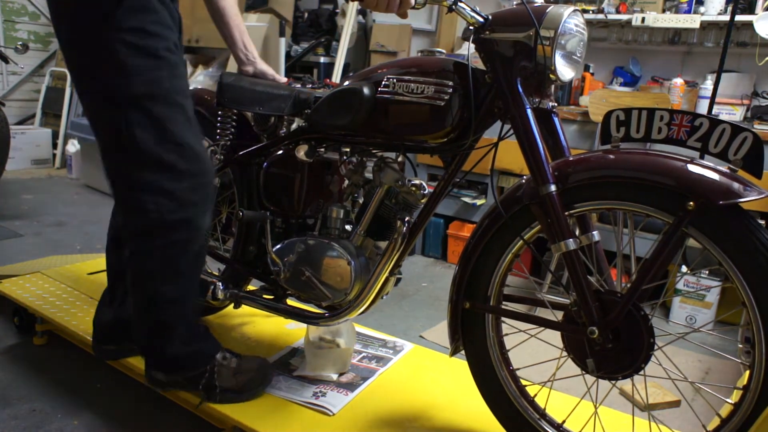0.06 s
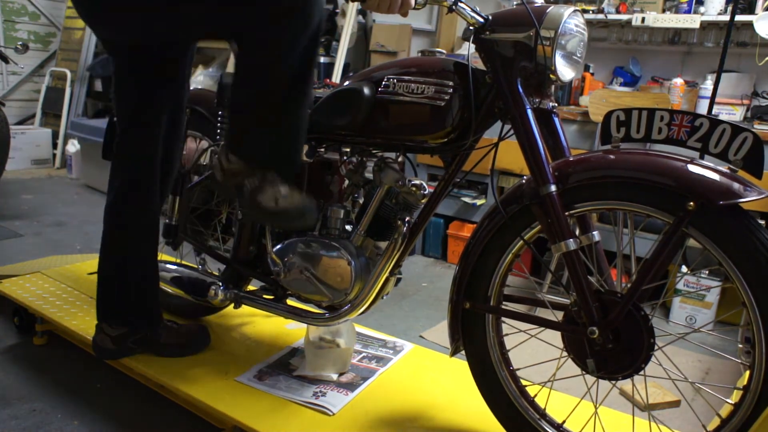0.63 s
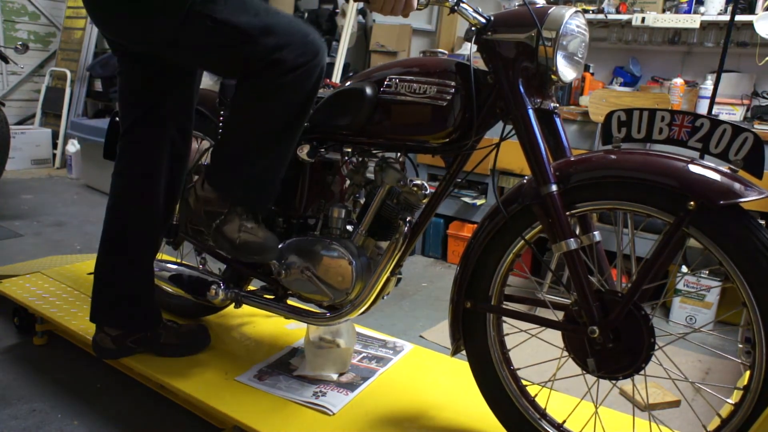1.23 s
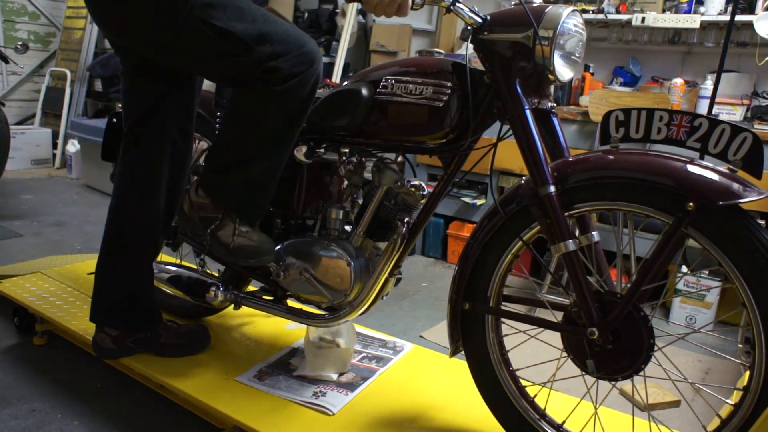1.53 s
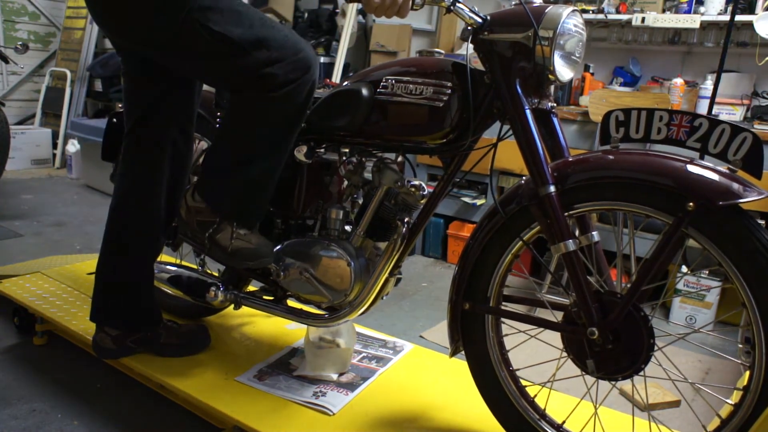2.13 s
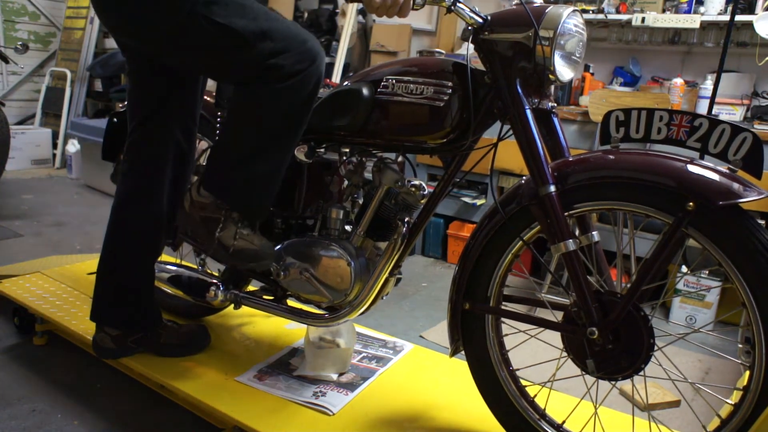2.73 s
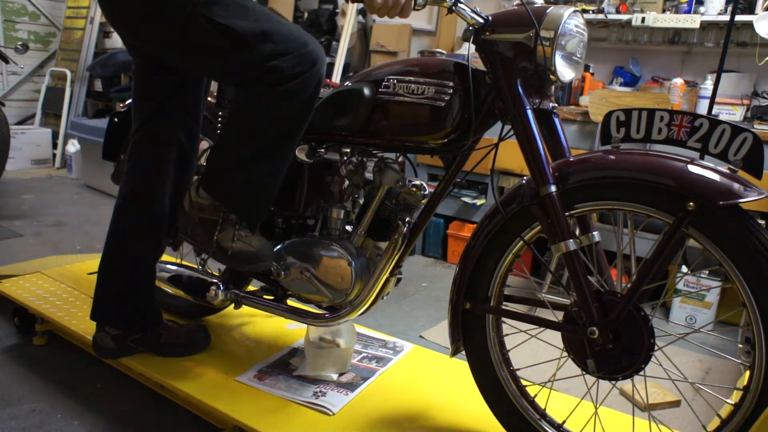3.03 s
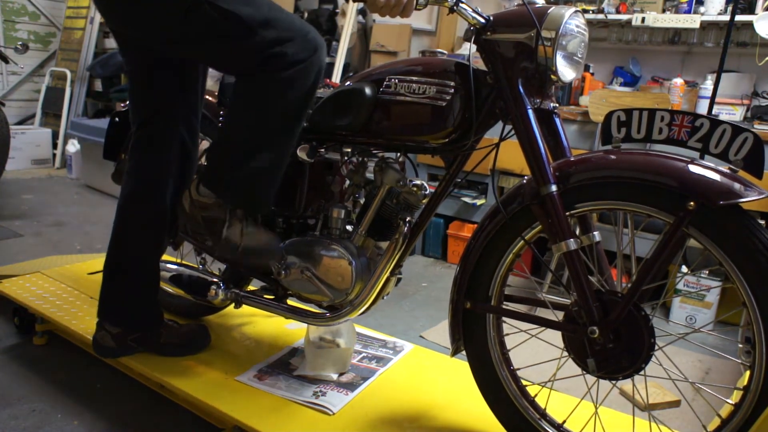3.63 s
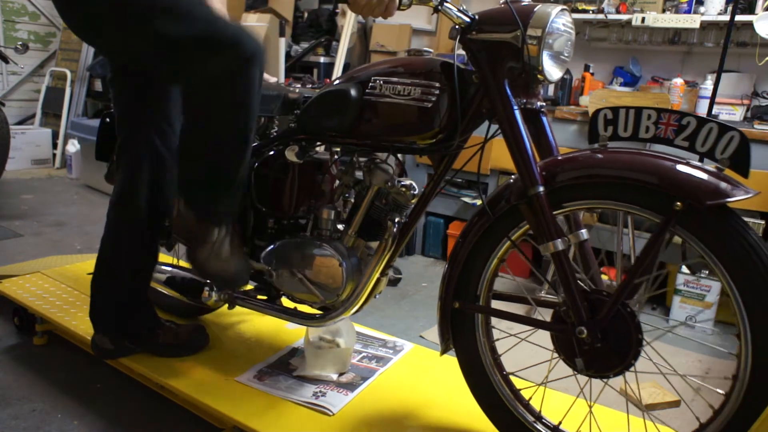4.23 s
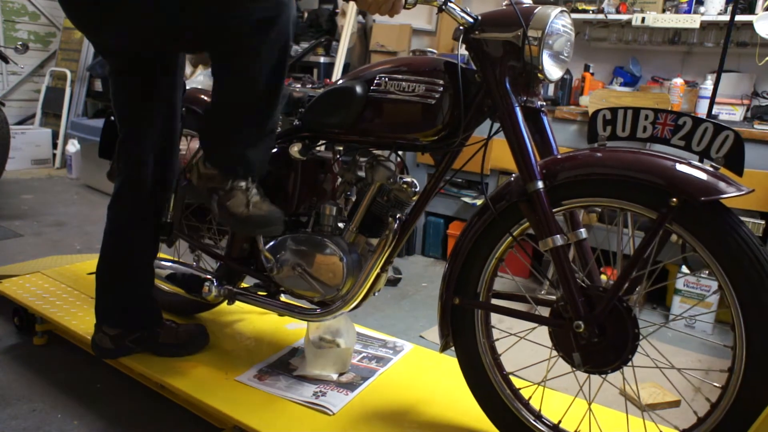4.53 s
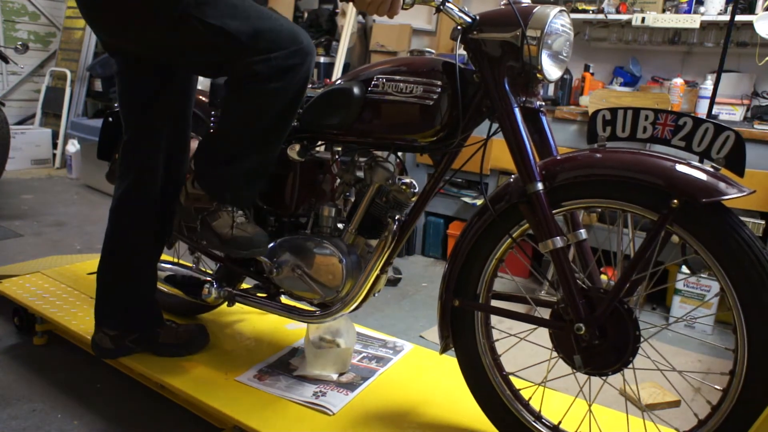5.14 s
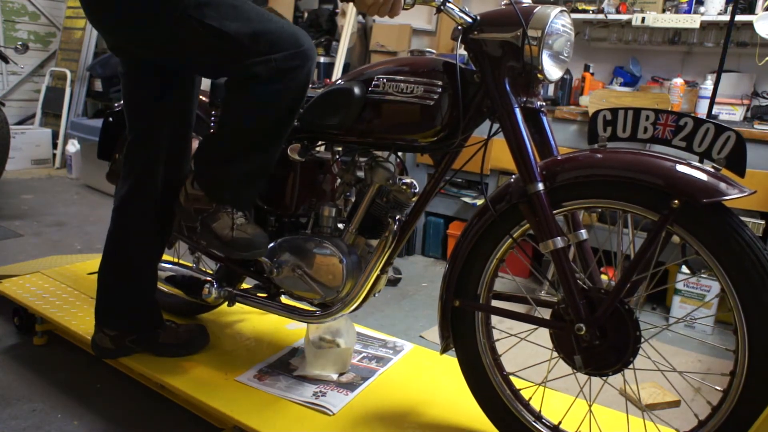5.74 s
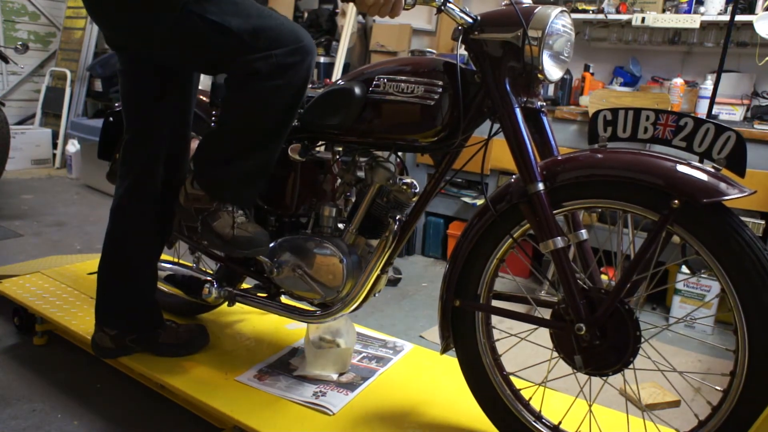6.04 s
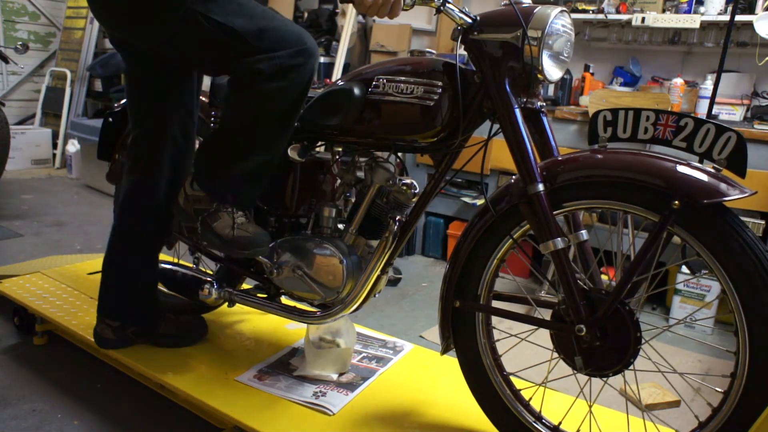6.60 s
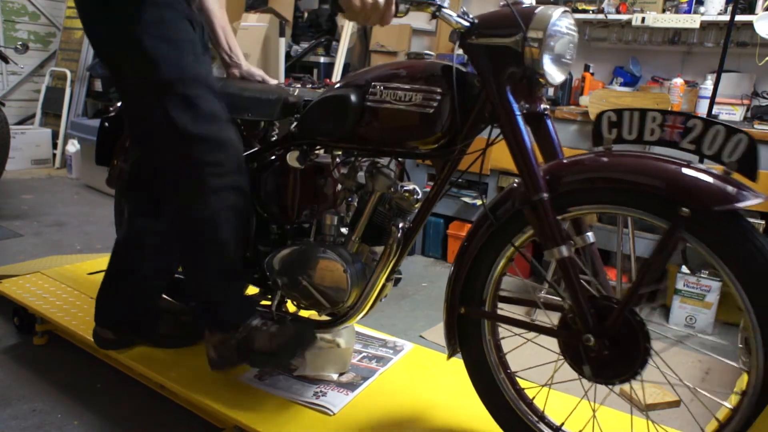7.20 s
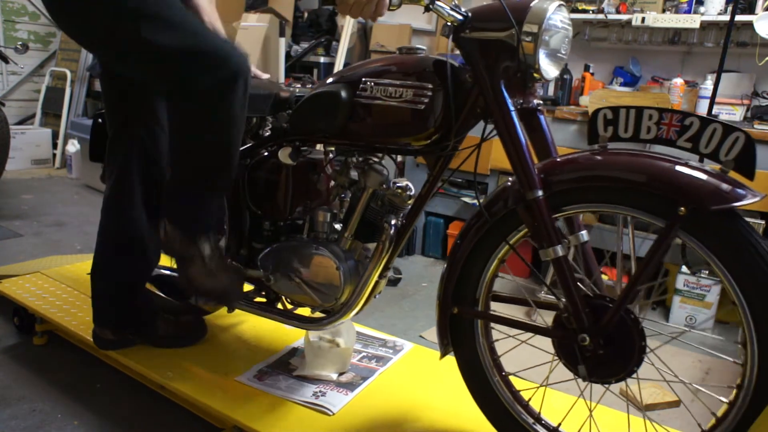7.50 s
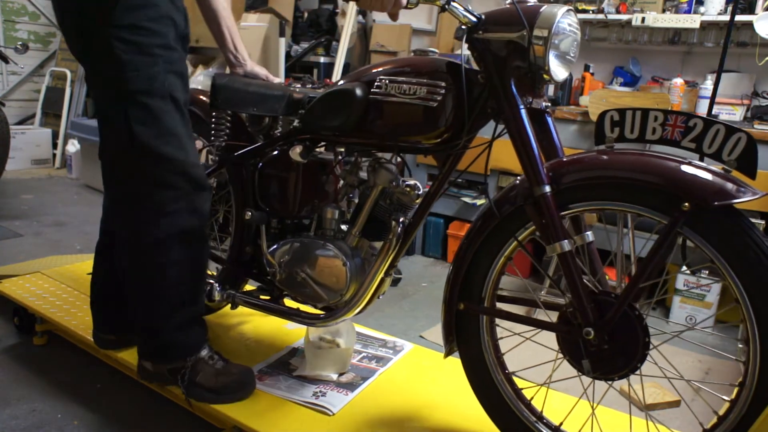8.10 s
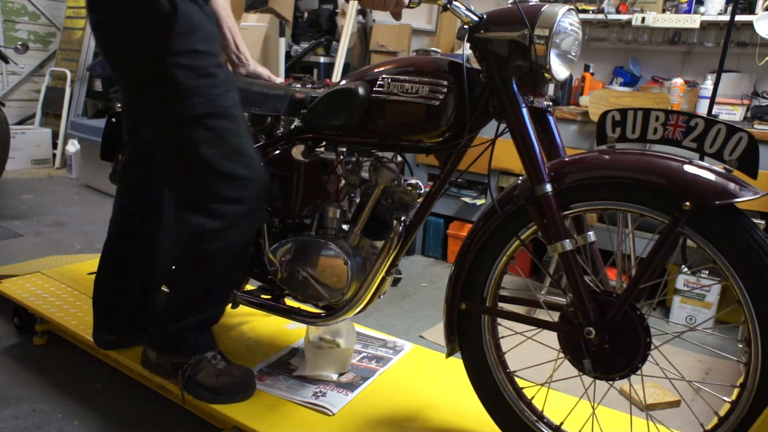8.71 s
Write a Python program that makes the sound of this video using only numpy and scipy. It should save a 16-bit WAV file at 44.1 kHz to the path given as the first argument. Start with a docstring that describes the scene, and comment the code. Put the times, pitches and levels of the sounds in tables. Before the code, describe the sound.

In a workshop, about two metres from the microphone, trousers rustle as a rider eases an old single-cylinder motorcycle over with soft hollow thumps, puffs of air and metal clicks. A hard kick spins the engine with whirring gears and a hooting intake, but it dies away as the ratchet zips back. A second kick catches, a boot thuds down, and the engine idles with clattering valves and uneven exhaust bangs.

```python
"""A workshop, short and dense in sound: two metres away, an old single-cylinder four-stroke motorcycle
is kickstarted. Trousers rustle as the rider eases the engine over with hollow thumps, puffs of air and
pawl clicks. One kick spins it in vain, with whirring gears, a hooting intake, a boot landing on the
steel lift and a zip of the ratchet. The next kick catches, and the engine idles with clattering valve
gear and uneven exhaust bangs."""
import sys
import numpy as np
from scipy import signal
from scipy.fft import rfft, irfft
from scipy.io import wavfile
from scipy.ndimage import uniform_filter1d

SR = 44100
rng = np.random.default_rng(int(sys.argv[2]) if len(sys.argv) > 2 else 0)


def unload_audio(sound):
    """Save the sound as a 16-bit wav file, at the path given as the first command line argument."""
    columns = np.transpose(np.atleast_2d(sound))
    # keep every value between -1 and 1, then stretch to whole-number steps
    steps = np.round(np.clip(columns, -1, 1) * 32767)
    wavfile.write(sys.argv[1], SR, steps.astype(np.int16))


N = 386316
T = np.arange(N) / SR
HIT_T = T[:2 ** 14]  # time axis of a one-shot


def undb(db):
    """Decibels to gain."""
    return 10 ** (np.asarray(db) / 20)


def unit(x):
    """Scale to rms 1."""
    return x / np.sqrt(np.mean(x ** 2))


def over_hz(f, points):
    """Join (Hz, value) rows on a logarithmic frequency axis."""
    hz, value = np.transpose(points)
    return np.interp(np.log(f + 1), np.log(hz), value)


def body(curve, modes=(), tilt=0):
    """Unit-energy impulse response from an EQ curve, resonances and a tilt in dB per octave."""
    f = np.fft.rfftfreq(len(HIT_T), 1 / SR)
    peaks = sum((undb(db) ** 2 - 1) / (1 + (2 * (f - hz) / width) ** 2) for hz, width, db in modes)
    colour = undb(over_hz(f, curve) + tilt * np.log2((f + 20) / 1000))
    gain = colour * np.sqrt(np.maximum(1 + peaks, 0.1))
    cepstrum = irfft(np.log(gain))[:len(f) - 1]  # minimum phase keeps the attack tight
    response = irfft(np.exp(2 * rfft(cepstrum, len(HIT_T)) - cepstrum[0]))
    return response / np.linalg.norm(response)


def ring(x, response):
    """Pass an excitation through a response."""
    return signal.oaconvolve(x, response)[:len(x)]


def add(track, s, sound):
    """Mix a sound into a track at time s."""
    start = int(s * SR)
    track[start:start + len(sound)] += sound[:N - start]


def blow(t60, shudder, contact_s):
    """One rounded push and a dying shudder of noise after it."""
    tail = rng.standard_normal(len(HIT_T)) * undb(-60 * HIT_T / t60) * (1 - np.exp(-HIT_T / 0.001))
    push = HIT_T * np.exp(-HIT_T / contact_s)
    force = shudder * tail / np.linalg.norm(tail) + push / push.sum()
    return force / np.hypot(1, shudder) * np.sqrt(SR / 50)


def grains(per_s, spread_db):
    """Random tiny impacts of uneven size, rms 1."""
    impacts = (rng.random(N) < per_s / SR) * rng.standard_normal(N)
    return unit(impacts * undb(spread_db * rng.uniform(-1.6, 1, N)))


def swells(rows, rise_db_per_s, fall_db_per_s):
    """Gain envelope of (start, hold, dB) events that share one attack and one release."""
    return sum(undb(db - rise_db_per_s * np.maximum(s - T, 0)
                    - fall_db_per_s * np.maximum(T - s - hold, 0)) for s, hold, db in rows)


# Stereo width of the workshop. Each row: frequency in Hz, side minus mid in dB.
ROOM_WIDTH = [(60, -5), (250, -8.5), (500, -9.5), (1000, -2.5), (2000, -1.5), (4000, 1.5), (11000, -0.5)]

def diffuse(x, y):
    """Two unrelated sounds as one diffuse field: alike in the bass, wide in the treble."""
    side = undb(over_hz(np.fft.rfftfreq(len(x), 1 / SR), ROOM_WIDTH))
    left_right = rfft(x) + np.array([[1], [-1]]) * side * rfft(y)
    return irfft(left_right / np.hypot(1, side), len(x))


# Reverb time of the workshop. Each row: frequency in Hz, t60 in seconds.
ROOM_DECAY = [(100, 0.76), (300, 0.44), (800, 0.34), (2000, 0.4), (5000, 0.33), (12000, 0.28)]

def room_tail():
    """Dense reflections, even in colour, whose treble dies first."""
    f, t, frames = signal.stft(rng.standard_normal(2 ** 16), SR, nperseg=256)
    tail = signal.istft(frames * undb(-60 * t / over_hz(f, ROOM_DECAY)[:, None]))[1]
    spectrum = rfft(tail * (1 - np.exp(-T[:len(tail)] / 0.00033)))
    even = spectrum / np.sqrt(uniform_filter1d(abs(spectrum) ** 2, size=24))
    return irfft(even)[:len(tail) // 2]


def place(x, room, wet_db, lag_samples):
    """Direct sound, lagging on the left (leading if negative), plus the room's reverb."""
    direct = np.array([np.roll(x, lag_samples), x])
    reverb = np.array([ring(x, side) for side in room])
    return (direct + undb(wet_db) * reverb) / np.hypot(1, undb(wet_db))


# EQ of the room tone. Each row: frequency in Hz, gain in dB.
ROOM_TONE_EQ = [(18, -51), (30, -30), (70, -8), (107, -14), (134, -6), (237, -3.5), (312, -4), (597, -6),
                (936, -9), (1540, -11), (11600, -21.5), (15100, -55), (22000, -120)]

def room_tone():
    """A steady, diffuse bed of workshop hiss."""
    return diffuse(*(ring(rng.standard_normal(N), body(ROOM_TONE_EQ)) for _ in range(2)))


# The rider's leg moves. Each row: start in seconds, hold in seconds, level in dB.
LEG_MOVES = [(0, 0.012, -42.5), (.36, 0.17, -45.5), (1.12, 0.39, -44.5), (2.42, 0.63, -53.5),
             (5.1, 0.19, -47.5), (5.8, 0.041, -56.5), (6.27, 0.31, -53), (6.92, .1, -52.5)]
# EQ of rubbing cloth. Each row: frequency in Hz, gain in dB.
CLOTH_EQ = [(60, -19), (250, -5), (500, 4), (1000, 0), (2500, -4), (6000, -9), (12000, -13.5)]

def rustle():
    """Trousers and boot rub in grainy swells as the leg moves."""
    motion = swells(LEG_MOVES, rise_db_per_s=57, fall_db_per_s=101)
    return ring(grains(4000, 5.5) * motion, body(CLOTH_EQ))


# Thumps of engine and starter lever. Each row: start in seconds, relative level in dB,
# brightness in dB per octave, shudder t60 in seconds.
THUMP_HITS = [(.129, -28, -2.5, 0.19), (.235, -36, -1, 0.099), (.805, -39, -14, 0.11),
              (0.914, -25, -2, 0.2), (1.09, -39.5, 0.5, 0.19), (1.330, -24.5, -1, 0.21),
              (2.710, -26.5, -3, 0.22), (3.795, -11.5, 0.2, 0.13), (4.291, -28.5, -1.5, 0.32),
              (4.71, -23.5, 3.5, 0.3), (4.858, -12, -0.5, 0.32), (6.623, -41, -1, 0.09),
              (7.073, -15, -0.5, 0.35), (7.108, -15, -1.5, 0.13)]
# EQ of their hollow body. Each row: frequency in Hz, gain in dB.
THUMP_EQ = [(40, -26), (110, -29), (220, 1), (400, 1), (600, 1), (780, -4), (1100, -2), (1700, 0),
            (3000, -8.5), (12000, -32.5)]
# Its resonances. Each row: centre in Hz, width in Hz, boost in dB.
THUMP_MODES = [(211.7, 9.6, 13.9), (257, 19, 7.3), (300, 20, 5.7), (394.4, 13, 17.7), (510, 49, 8.2),
               (581, 22, 12.8), (950, 140, 7.5), (1148, 54, 13.2), (1350, 22, 8.5)]

def thumps():
    """Hollow blows as the piston passes compression and the lever meets its stop."""
    out = np.zeros(N)
    for s, db, tilt, t60 in THUMP_HITS:
        force = blow(t60, shudder=1.64, contact_s=0.00009)
        add(out, s, undb(db) * ring(force, body(THUMP_EQ, THUMP_MODES, tilt)))
    return out


# Soft puffs of air and, loudest, the ratchet's zip. Each row: start in seconds, relative level in dB,
# brightness in dB per octave, length in seconds.
NOISE_BURSTS = [(0.175, -29, -4, 0.056), (0.719, -36, -4, 0.12), (0.885, -28.5, -3.5, 0.054),
                (1.438, -31, -3.5, 0.022), (1.64, -45.5, -3, 0.028), (2.794, -26, -3.5, 0.061),
                (4.168, -10, 3, 0.053)]
# EQ of puffs and zip. Each row: frequency in Hz, gain in dB.
BURST_EQ = [(60, -40), (250, -9), (500, 5), (1100, 4.5), (2500, -3), (4500, 4), (7000, 10.5), (9500, 3.5),
            (11200, 4), (12500, -10)]
# Bright, ringing zip of the kickstart ratchet. Each row: centre in Hz, width in Hz, boost in dB.
RATCHET_MODES = [(2800, 900, 14.5), (3470, 250, 11), (4300, 220, 13.5), (10700, 120, 8), (11300, 90, 10)]
ZIP_ABOVE_DB = -20

def puffs_and_zip():
    """Trapped air puffs out as a valve lifts; the loudest burst is the ratchet's ringing zip."""
    out = np.zeros(N)
    for s, db, tilt, length in NOISE_BURSTS:
        envelope = (1 - np.exp(-HIT_T / 0.005)) / (1 + (HIT_T / length) ** 6)
        colour = body(BURST_EQ, RATCHET_MODES if db > ZIP_ABOVE_DB else (), tilt)
        add(out, s, undb(db) * ring(envelope * rng.standard_normal(len(HIT_T)), colour))
    return out


# Clicks of pawl, lever and linkage. Each row: start in seconds, relative level in dB, centre in Hz,
# width in octaves, chatter t60 in seconds.
METAL_CLICKS = [(0.727, -25.5, 3200, 0.57, 0.051), (0.735, -29, 4830, 0.18, 0.013),
                (.846, -21, 1900, 0.7, 0.044), (1.213, -41.5, 3340, 0.45, .03),
                (1.253, -37.5, 2020, 1, 0.21), (2.659, -33.5, 1640, 1.1, 0.068),
                (3.87, -11, 1710, 3.1, 0.085), (4.428, -26, 1320, 0.58, 0.17),
                (4.699, -25, 1540, 1.2, 0.23), (4.721, -27.5, 2680, 0.19, 0.16),
                (4.858, -20.5, 2230, 0.56, 0.15), (5.22, -46, 5100, 0.59, 0.044),
                (6.23, -49, 2180, 1.9, 0.2), (6.4, -49.5, 1310, 0.28, 0.033),
                (7.145, -12.5, 1450, 0.29, 0.22), (7.727, -17, 3150, 0.079, 0.092)]
# Steely ring of the lever. Each row: centre in Hz, width in Hz, boost in dB.
STEEL_MODES = [(1430, 74, 4.8), (1790, 77, 7.4), (1984, 75, 7.2), (2780, 14, 2.9), (3093, 50, 8.5),
               (5130, 190, 5.9)]

def clicks():
    """Each steel contact excites one band of the mechanism's ring, with weak skirts."""
    out, f = np.zeros(N), np.geomspace(20, SR / 2, num=128)
    for s, db, hz, octaves, t60 in METAL_CLICKS:
        away = abs(np.log2(f / hz))
        band = np.column_stack([f, -13 * np.log10(1 + (away / octaves) ** 2) - 3.5 * away])
        force = blow(t60, shudder=2.2, contact_s=0.00003)
        add(out, s, undb(db) * ring(force, body(band, STEEL_MODES)))
    return out


# Squeaks of the lever and its return spring. Each row: start in seconds, level in dB,
# opening pitch in Hz, closing pitch in Hz, length in seconds.
LEVER_SQUEAKS = [(3.127, -55, 2080, 2020, 0.046), (4.003, -19, 3210, 2906, 0.049),
                 (4.702, -26, 1853, 1630, 0.099), (5.344, -42.5, 1575, 1880, 0.0344),
                 (7.362, -18.5, 3177, 2750, 0.062)]

def squeaks():
    """Dry steel sticks and slips: a gliding tone whose pitch trembles."""
    out = np.zeros(N)
    for s, db, from_hz, to_hz, length in LEVER_SQUEAKS:
        progress = np.minimum(HIT_T / length, 1)
        tremble = unit(uniform_filter1d(rng.standard_normal(len(HIT_T)), size=48))
        hz = (from_hz + (to_hz - from_hz) * progress) * (1 + 0.067 * tremble)
        envelope = np.sqrt(2 * abs(np.sin(np.pi * progress)))
        add(out, s, undb(db) * envelope * np.sin(2 * np.pi * np.cumsum(hz) / SR))
    return out


def whistle(start_s=3.44, length_s=0.22, hz=4980, db=-58):
    """A faint, thin tone swells and fades just before the first kick."""
    progress = np.clip((T - start_s) / length_s, 0, 1)
    return undb(db) * np.sin(np.pi * progress) * np.sin(2 * np.pi * hz * T)


# Kicks that spin the crank. Each row: start in seconds, spin-up time in seconds.
STARTER_KICKS = [(3.704, 0.068), (7.005, .06)]
KICK_RATE, RATTLE_RATE, IDLE_RATE = 15, 9.68, 20.5  # nominal four-stroke cycles per second
COAST_S = 0.95  # friction stops an unfired engine in this time

def crank():
    """Speed and cycle count: kicked, the crank coasts; once it fires, whole cycles fit between bangs."""
    kicked = sum(KICK_RATE * np.clip((T - s) / rise, 0, 1)
                 * np.sqrt(np.clip(1 - (T - s) / COAST_S, 0, 1)) for s, rise in STARTER_KICKS)
    fires = np.array(EXHAUST_BANGS)[:, 0]
    gaps = np.diff(fires)
    rates = np.append(np.maximum(np.round(gaps * IDLE_RATE), 1) / gaps, IDLE_RATE)
    speed = np.where(T > fires[0], rates[np.searchsorted(fires, T) - 1], kicked)
    cycle = np.cumsum(speed) / SR
    return speed, cycle - np.interp(fires[0], T, cycle) % 1


def strikes(cycle, angle):
    """One impulse each time the crank passes this share of its cycle."""
    turns = np.floor(cycle - angle)
    return np.diff(turns, prepend=turns[0])


def rattling(speed):
    """Gain of the moving parts: steady at speed, dying quickly below RATTLE_RATE."""
    drive = (speed / RATTLE_RATE) ** 10
    return drive / (1 + drive)


# Heavy load on the gears. Each row: start in seconds, hold in seconds, level in dB.
GEAR_LOADS = [(3.79, 0.023, -19.5), (4.0, 0.031, -24.5), (4.30, 0.2, -31), (7.08, 0.23, -17.5),
              (7.49, 0.029, -14.5), (8.1, 0.09, -23.5)]
# EQ of the whirr, also the intake's breath. Each row: frequency in Hz, gain in dB.
WHIRR_EQ = [(60, -37), (200, -10.5), (400, -1.5), (750, -0.5), (1100, -7.5), (1600, -6), (2500, -7),
            (5000, -11.5), (12000, -19.5)]

def gears(speed):
    """Gear teeth and chain rollers whirr while the crank turns and grind when it is driven hard."""
    load = undb(-35) * rattling(speed) + swells(GEAR_LOADS, rise_db_per_s=434, fall_db_per_s=154)
    return ring(grains(4000, 4.0) * load, body(WHIRR_EQ, STEEL_MODES[:1]))


# Taps of valves and piston. Each row: position as a share of the cycle, relative level in dB.
ENGINE_TAPS = [(0.03, 11), (.27, 9), (.52, 10.5), (.78, 3)]
# EQ of the engine casing. Each row: frequency in Hz, gain in dB.
CASING_EQ = [(40, -12), (150, -22.5), (300, -4.5), (850, 2.5), (1400, -5.5), (2100, 0), (3300, 3),
             (5000, 0), (7500, -4.5), (11000, -10), (12500, -29)]
# Ring of the finned barrel. Each row: centre in Hz, width in Hz, boost in dB.
BARREL_MODES = [(237, 18, 1.7), (360, 34, 2.8), (698, 28, 2.5), (784, 19, 5.9), (1950, 340, 4.5),
                (2767, 36, 8.5), (3160, 160, 4.2), (4240, 200, 3.4), (5030, 32, 3.5), (6170, 99, 3.5)]

def clatter(speed, cycle, unfired):
    """Valves and piston slap tap the barrel at set crank angles over chain rattle, louder unfired."""
    force = sum(undb(db) * strikes(cycle, angle) for angle, db in ENGINE_TAPS)
    force *= undb(2.77 * rng.standard_normal(N))
    tap_envelope = ring(force, np.exp(-HIT_T / 0.0033))
    taps = undb(-23.5) * unit(tap_envelope * rng.standard_normal(N))
    chain = undb(-26.5) * grains(3000, 3.5)
    rattle = rattling(speed) * undb(2 * unfired) * (taps + chain)
    return ring(rattle, body(CASING_EQ, BARREL_MODES))


# Bassy EQ of the chuff, also the lift's boom. Each row: frequency in Hz, gain in dB.
BOOM_EQ = [(20, -30), (45, -9), (72, 1.5), (100, -4), (145, 0), (190, -8.5), (400, -7), (2000, -75)]
# Exhaust pipe resonances, shared with the bangs. Each row: centre in Hz, width in Hz, boost in dB.
EXHAUST_MODES = [(152, 20, 11), (236.4, 22, 12.5), (327, 48, 9), (597, 11.6, 13), (741.5, 11, 17)]

def chuff(speed, cycle, unfired):
    """Gas chuffs through the pipe's lowest resonance once a cycle, softer until the engine fires."""
    strokes = unit(strikes(cycle, angle=0.94) * undb(5.3 * rng.standard_normal(N)))
    gas = (strokes + 0.22 * rng.standard_normal(N)) * rattling(speed) * undb(-40.5 - 6 * unfired)
    return ring(gas, body(BOOM_EQ, EXHAUST_MODES[:1]))


# Bright ring of the rocker gear. Each row: frequency in Hz, t60 in seconds, relative level in dB.
ROCKER_PARTIALS = [(3085, .07, -3), (3112, .07, -2), (4305, .07, -4), (4947, .1, -10)]

def rockers(speed, cycle, scatter_db=3.5):
    """The rocker gear chinks unevenly once a cycle, much harder as the engine picks up speed."""
    force = undb(-21 + scatter_db * rng.standard_normal(N)) * np.minimum(speed / IDLE_RATE, 1) ** 2
    chink = sum(undb(db - 60 * HIT_T / t60) * np.sin(2 * np.pi * hz * HIT_T)
                for hz, t60, db in ROCKER_PARTIALS)
    return ring(force * strikes(cycle, angle=0.18), chink)


# Gulps of air at the carburettor. Each row: start in seconds, level in dB, length in seconds.
INTAKE_GULPS = [(3.841, -16.5, 0.037), (3.903, -23, 0.044), (7.187, -19, 0.039)]

def intake(hz=391.5):
    """The falling piston draws a short, breathy hoot from the intake tract."""
    out = np.zeros(N)
    hoot = np.sqrt(2) * np.sin(2 * np.pi * hz * HIT_T)
    for s, db, length in INTAKE_GULPS:
        draw = np.sin(np.pi * np.minimum(HIT_T / length, 1))
        breath = ring(rng.standard_normal(len(HIT_T)), body(WHIRR_EQ))
        add(out, s, undb(db) * draw * (hoot + 0.5 * breath))
    return out


# Boot landings. Each row: start in seconds, level in dB.
BOOT_STOMPS = [(3.957, -35.5), (7.229, -25)]

def stomps():
    """The steel lift booms as the boot comes down after each kick."""
    out = np.zeros(N)
    for s, db in BOOT_STOMPS:
        force = blow(t60=0.15, shudder=3, contact_s=0.00061)
        add(out, s, undb(db) * ring(force, body(BOOM_EQ, tilt=-2.1)))
    return out


# The cycles that fire hard. Each row: start in seconds, relative level in dB.
EXHAUST_BANGS = [(7.226, -10.5), (7.259, -17), (7.296, -12), (7.339, -26), (7.413, -17), (7.469, -8),
                 (7.514, -12), (7.559, -24), (7.776, -10), (7.983, -10.5), (8.039, -26), (8.088, -9),
                 (8.132, -11), (8.174, -11.5), (8.219, -16), (8.255, -15), (8.543, -12.5), (8.735, -11)]
# EQ of the exhaust pipe. Each row: frequency in Hz, gain in dB.
EXHAUST_EQ = [(40, -52), (90, -18), (150, -2.5), (195, -17.5), (260, 1), (450, 1), (750, -5.5), (1100, -9),
              (2500, -9.5), (6000, -24.5), (12000, -19.5)]
FULL_BANG_DB = -15.5

def exhaust():
    """Each hard firing sends a blunt pressure pulse through the silencer, then a rush of gas."""
    out = np.zeros(N)
    for s, db in EXHAUST_BANGS:
        tilt = 2.22 - 1.14 * max(FULL_BANG_DB - db, 0)  # weak bangs are duller
        pulse = blow(t60=0.12, shudder=0.5, contact_s=0.00018)
        add(out, s, undb(db) * ring(pulse, body(EXHAUST_EQ, EXHAUST_MODES, tilt)))
    return out


def scene():
    """Motorcycle and rider share one reverb over the bed of room tone."""
    room = diffuse(room_tail(), room_tail())
    speed, cycle = crank()
    unfired = T < EXHAUST_BANGS[0][0]
    bed = undb(-53) * room_tone()
    bangs = undb(3) * exhaust()
    starter = undb(1.5) * (thumps() + puffs_and_zip()) + gears(speed)
    highs = undb(1) * clicks() + squeaks() + whistle()
    engine = clatter(speed, cycle, unfired) + chuff(speed, cycle, unfired) + rockers(speed, cycle)
    return (bed
            + place(starter, room, wet_db=3.5, lag_samples=4)
            + place(highs, room, wet_db=2, lag_samples=-1)
            + place(engine, room, wet_db=10, lag_samples=-2)
            + place(intake(), room, wet_db=-9, lag_samples=0)
            + place(rustle() + stomps(), room, wet_db=9.5, lag_samples=0)
            + place(bangs, room, wet_db=-2, lag_samples=-2))


def record(dry, low_hz=38, ceiling=0.9, top_hz=12300):
    """The microphone thins deep bass and rounds peaks; a steep low-pass cuts above about 12 kHz."""
    thinned = signal.sosfilt(signal.butter(3, low_hz, "highpass", fs=SR, output="sos"), dry)
    rounded = thinned / (1 + (thinned / ceiling) ** 6) ** (1 / 6)
    return signal.sosfilt(signal.ellip(10, 0.2, 70, top_hz, fs=SR, output="sos"), rounded)


dry = scene()
out = record(dry)
unload_audio(out)
```